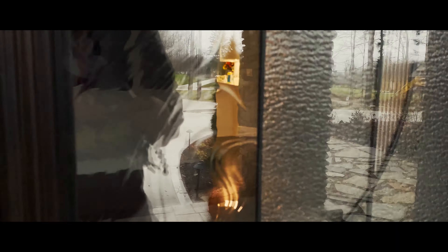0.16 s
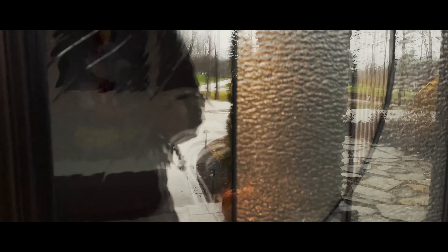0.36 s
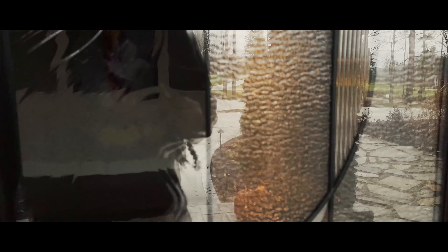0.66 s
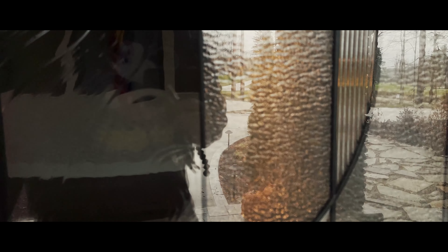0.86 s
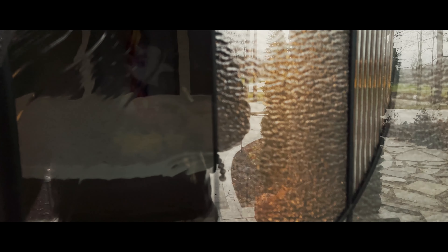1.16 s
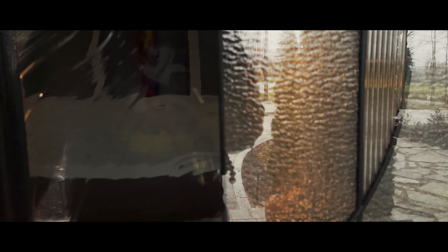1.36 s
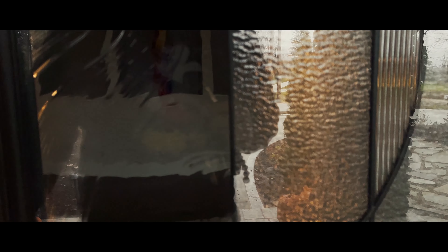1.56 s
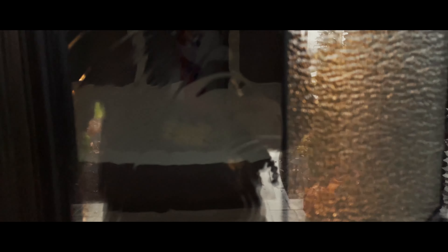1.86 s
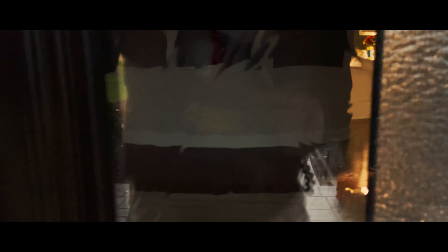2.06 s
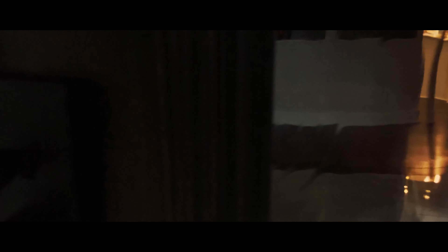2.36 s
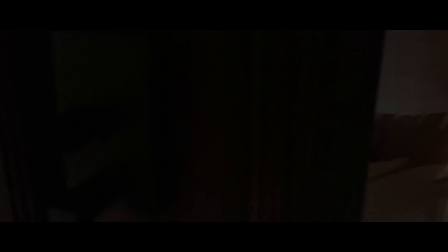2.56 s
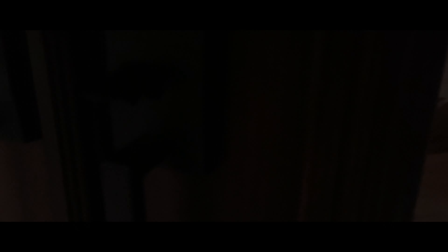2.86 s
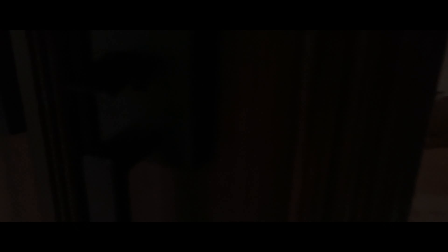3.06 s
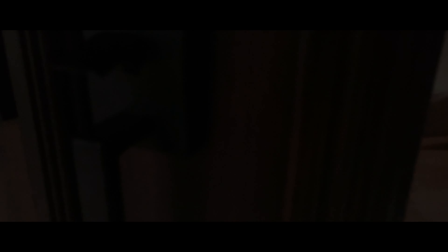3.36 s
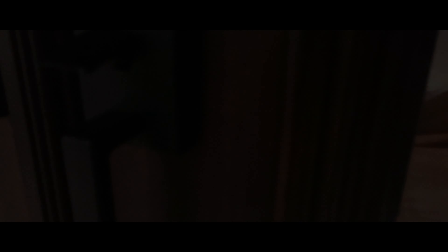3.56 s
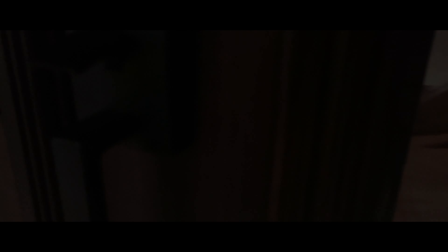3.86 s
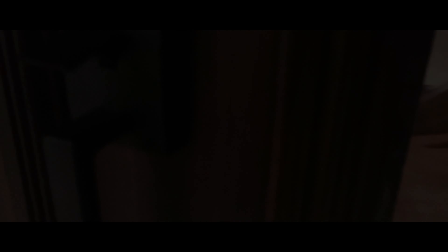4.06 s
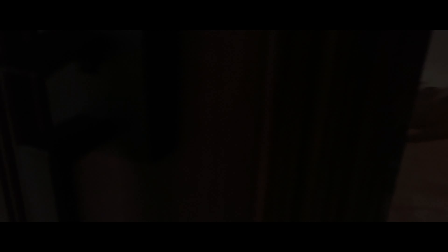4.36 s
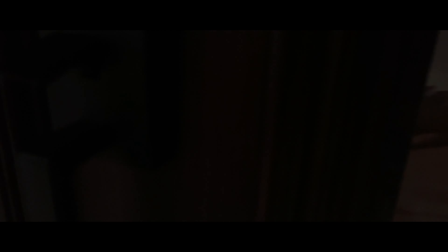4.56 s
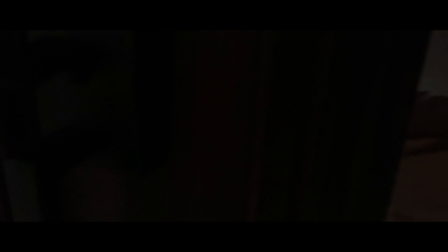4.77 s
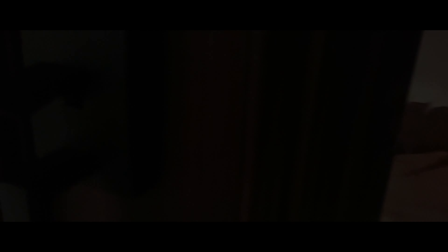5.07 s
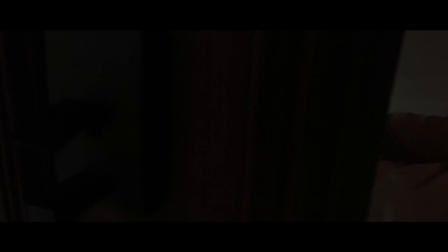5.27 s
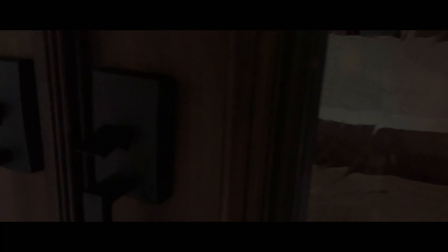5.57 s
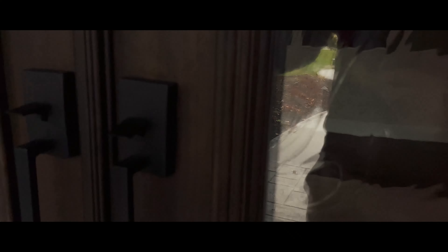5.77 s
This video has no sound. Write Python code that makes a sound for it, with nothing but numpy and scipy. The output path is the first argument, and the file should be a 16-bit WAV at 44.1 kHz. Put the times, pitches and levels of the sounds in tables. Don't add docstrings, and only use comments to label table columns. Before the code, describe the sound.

Close stereo handheld pickup outside a front door. Cloth rustles, small snaps and a dull double footfall on wooden boards come first, over distant traffic and a low engine hum. Tiny high clicks follow. After a quiet stretch, knuckles rap seven times, evenly spaced, on a heavy glazed door, each with a woody thump, brief ring and faint lock and glass rattle. Rustling and ticks end it.

```python
import sys
import numpy as np
from scipy import signal
from scipy.fft import rfft, irfft, next_fast_len
from scipy.io import wavfile
from scipy.ndimage import uniform_filter1d

SR = 44100
rng = np.random.default_rng(int(sys.argv[2]) if len(sys.argv) > 2 else 0)


def output_pcm(signal):
    pcm = np.clip(np.atleast_2d(signal).T, -1, 1) * 32767
    wavfile.write(sys.argv[1], SR, np.round(pcm).astype(np.int16))


def amplitude_ratio(level_db):
    exponent = np.asarray(level_db, float) / 20
    return 10 ** exponent


N = 261056
T = np.arange(N) / SR
PORTS_M = 0.38
DOOR_SIZE, LEAD_S = 32768, 0.02


def colour(table, size):
    hz, db = np.transpose(table)
    bins = np.log(np.fft.rfftfreq(size, 1 / SR) + 1)
    return amplitude_ratio(np.interp(bins, np.log(hz), db, left=-90, right=-90))


def hump(hz):
    return [(hz / 3, -24), (hz / 1.47, -10), (hz, 0), (hz * 1.33, -8), (hz * 1.35, -15),
            (min(hz * 4, 12500), -28)]


def causal(gain):
    fold = irfft(np.log(gain))
    half = len(fold) // 2
    return np.exp(rfft(np.r_[fold[0], 2 * fold[1:half], fold[half], np.zeros(half - 1)]))


def unit(x):
    return x / np.sqrt(np.mean(x ** 2))


def pan(db):
    return amplitude_ratio(np.array([[db / 2], [-db / 2]]))


def add(out, s, x):
    i = int(s * SR)
    out[:, i:i + x.shape[1]] += x[:, :N - i]


def diffuse(size):
    like = np.sinc(2 * np.fft.rfftfreq(size, 1 / SR) * PORTS_M / 343)
    mid, side = rfft(rng.standard_normal((2, size)))
    return np.sqrt(1 + like) * mid + np.sqrt(1 - like) * side * np.array([[1], [-1]])


def walk(rate):
    k = int(SR / rate)
    held = rng.standard_normal(1024)[np.arange(N) // k]
    return uniform_filter1d(uniform_filter1d(held, k), k)


def ring(t, hz, db, t60):
    return amplitude_ratio(db - 60 * t / t60) * np.sin(2 * np.pi * hz * t)


def burst(table, db, t60, pan_db, rise=0.00092, size=16384):
    own = rng.standard_normal((3, size))
    noise = unit(irfft(rfft(own[0] + 2.64 * own[1:]) * colour(table, size), size))
    t = T[:size]
    fade = amplitude_ratio(db - 60 * t / max(t60, .004)) * np.cos(np.pi / 2 * t / t[-1])
    return noise * pan(pan_db) * fade * (1 - np.exp(-t / rise))


def bed(table, split_hz, flicker_db, rate):
    size = next_fast_len(N, True)
    f = np.fft.rfftfreq(size, 1 / SR)
    spectrum = diffuse(size) * colour(table, size)
    out = np.zeros((2, 2, N))
    for k in np.arange(8, 28):
        share = np.clip(1 - np.abs(2 * np.log2(f + 1) - k), 0, 1)
        band = irfft(spectrum * share, size)[:, :N]
        out[int(2 ** (k / 2) > split_hz)] += band * amplitude_ratio(flicker_db * walk(rate))
    return unit(out[0]), unit(out[1])


# t/s, peak level/dB, knuckle hardness f/Hz, body thump level/dB, left minus right level/dB
KNOCK_EVENTS = [
    (3.4543, -13.5, 762, -5, -2),
    (3.7322, -12, 1020, -7.5, -2),
    (4.0539, -18, 640, 4.5, -2),
    (4.3812, -11.5, 1450, -6.5, -2),
    (4.721, -14, 1480, -6, -2),
    (5.066, -13, 1030, -4, -2),
    (5.3365, -13.5, 1450, -8.5, -2),
]
SPOT_FREQS = [330, 450, 600, 760, 950, 1250, 1520]
KNOCK_SPOTS = [
    (5, 2, -2, -3, -7.5, -2, -8),
    (6, 1, -1, -1, -5, 0, -7),
    (6, 1, -2, -1, -3, -2, -5),
    (6, 6, 4, 0, 0, 3, -2),
    (6, 6, 4, -1, -1, 2, -4),
    (6, 3, 1, -3, -5, 2, -6.5),
    (6, 6, 6, 1, -5, 7, -3),
]


def door():
    f = np.fft.rfftfreq(DOOR_SIZE, 1 / SR)
    out = np.zeros((2, N))
    direct = panel_chirps(f)
    body = direct / np.abs(irfft(direct, DOOR_SIZE)).max()
    body = body + amplitude_ratio(-17.5) * panel_modes(f) * f ** 2 / (f ** 2 + 50 ** 2)
    body = body + amplitude_ratio(-33) * panel_wash(f)
    for (s, db, hard_hz, thump_db, pan_db), spot_db in zip(KNOCK_EVENTS, KNOCK_SPOTS):
        push = amplitude_ratio(thump_db / (1 + (f / 130) ** 2)) / np.sqrt(1 + (f / hard_hz) ** 2)
        push = push * amplitude_ratio(np.interp(f, [200, *SPOT_FREQS], [0, *spot_db]))
        push = np.where(f > 2000, .38, push)
        blow = irfft(body * causal(push), DOOR_SIZE)
        add(out, s - LEAD_S - .0003, blow * amplitude_ratio(db + 6) * pan(pan_db))
    return out


# left delay t/ms, right delay t/ms, spread t/ms at 100 Hz,
# left level/dB, right level/dB, lowest f/Hz that turns back
PANEL_PATHS = [
    (-1.05, -0.82, 10.8, 2.7, 1.5, 18),
    (-0.78, 4.43, 10.7, -11.4, 4.4, 122),
    (2.65, 6.3, 13.5, -28, -6.7, 221),
    (9.2, 14.6, 13.5, -18, -22.5, 240),
]
# f/Hz, level/dB per Hz
BLOW_COLOUR = [(35, -23.5), (60, -4.5), (110, -6.5), (160, -1.5), (200, -2), (270, 2.5), (370, -1),
               (460, -11.5), (570, 2), (700, -5.5), (900, 6.3), (1080, -1.5), (1180, -18.5), (1270, -2),
               (1390, -37), (1520, 1), (1700, -43.5), (2400, -70)]


def panel_chirps(f):
    chirps = 0
    for left_ms, right_ms, spread, left_db, right_db, low_hz in PANEL_PATHS:
        delay = LEAD_S + np.array([[left_ms], [right_ms]]) / 1000
        turn = f * delay + spread / 50 * np.sqrt(f)
        gain = amplitude_ratio(np.array([[left_db], [right_db]])) * f ** 2 / (f ** 2 + low_hz ** 2)
        chirps = chirps + gain * np.exp(-2j * np.pi * turn)
    blow = causal(np.maximum(colour(BLOW_COLOUR, DOOR_SIZE), amplitude_ratio(-45.5)))
    shade = np.array([np.ones_like(f), 1 / np.sqrt(1 + (f / 640) ** 5)])
    return blow * chirps / (1 + (f / 2200) ** 8) * shade


# f/Hz, level/dB, t60 t/s, left minus right level/dB
MODES = [(65.7, 15.8, 0.088, 1.7), (101.2, 1.5, 0.13, 3.5), (163, -8, 0.45, -1), (200.4, 3.3, 0.2, 3.4),
         (290, -14.5, 0.18, -4.5), (331, -13.5, 0.4, 0), (382, -15.5, 0.3, -7), (450, -12, 0.35, 1),
         (530.4, -11.5, 0.24, 4.5), (562.5, -11, 0.15, -2), (660, -11.5, 0.3, 6.5), (680.4, -10, 0.053, -3),
         (769, -1.5, 0.135, 3), (850, -8.5, 0.165, 7), (893, -10, 0.2, 11.5), (1244.4, -20.5, 0.14, 3)]


def panel_modes(f):
    t = T[:DOOR_SIZE]
    modes = rfft(sum(ring(t, hz, db, t60) * pan(pan_db) for hz, db, t60, pan_db in MODES))
    turn = f * (LEAD_S + np.array([[.0002], [.0006]])) + 0.1863 * np.sqrt(f)
    return modes * np.exp(-2j * np.pi * turn)


# f/Hz, level/dB per Hz
WASH_COLOUR = [(40, -23.5), (70, 3.5), (120, -3), (200, -1), (260, -10), (340, -6), (587, -10), (950, -10),
               (1500, -28.5), (3400, -36), (7000, -57), (9000, -59.5), (11300, -60), (12500, -79)]
# f/Hz, t60 t/s
WASH_T60 = [(60, 0.13), (300, 0.32), (1100, 0.42), (3000, 0.24), (10000, 0.083)]


def panel_wash(f):
    noise = diffuse(DOOR_SIZE) * colour(WASH_COLOUR, DOOR_SIZE)
    late = np.maximum(T[:DOOR_SIZE] - LEAD_S, 0)
    hz, seconds = np.transpose(WASH_T60)
    wash = 0
    for k in np.arange(5, 15):
        t60 = np.interp(k, np.log2(hz), seconds)
        band = irfft(noise * np.clip(1 - np.abs(np.log2(f + 1) - k), 0, 1), DOOR_SIZE)
        wash = wash + band * amplitude_ratio(-60 * (late - .07) / t60) * (1 - np.exp(-late / 0.01))
    return rfft(wash) / np.std(irfft(noise, DOOR_SIZE))


# t/s, peak level/dB, ring f/Hz
RATTLES = [(3.49, -51, 2800), (3.504, -51, 3300), (3.59, -59, 2800), (3.605, -59, 3300), (3.692, -63, 3300),
           (3.782, -48, 3300), (3.869, -58, 3300), (3.908, -60, 3500), (5.17, -56, 3300), (5.44, -58, 3300),
           (3.5212, -50.5, 3445), (3.5604, -57.5, 3323), (3.7666, -45, 2470), (3.799, -52.5, 3520),
           (3.837, -58.5, 3400), (3.8895, -58.5, 3750), (3.9654, -67, 3432), (4.086, -45.5, 2493),
           (4.1078, -48, 3330), (4.1538, -59, 2290), (4.2387, -53.5, 3020), (4.4456, -46, 3330),
           (4.5818, -55.5, 2840), (4.7035, -64, 2860), (4.7828, -48.5, 3240), (4.8847, -55, 3955),
           (4.955, -64, 3139), (5.1, -48, 2450), (5.126, -48, 3340), (5.25, -51, 2830), (5.3705, -48, 2423),
           (5.4053, -45.5, 3348), (5.4892, -62.5, 2450)]
# wait t/s, peak level/dB, ring f/Hz
LOCK_BOUNCES = [
    (0.013, -46.5, 2420),
    (0.138, -59, 2400),
]
# f/Hz, level/dB per Hz
CHATTER_COLOUR = [(710, -33), (1200, 14), (2510, -1), (4090, 0), (7080, -35.5), (8470, -24), (10100, -38),
                  (11900, -40), (13000, -60)]


def lock():
    out = np.zeros((2, N))
    t60 = 0.04
    bounces = [(s + wait, db, hz) for s, *_ in KNOCK_EVENTS for wait, db, hz in LOCK_BOUNCES]
    for s, db, hz in RATTLES + bounces:
        pan_db = 1.5 + 5 * np.log2(hz / 2400)
        add(out, s, burst(hump(hz), db - 4, t60, pan_db, size=2048))
        add(out, s, burst(CHATTER_COLOUR, db - 3, t60, pan_db, size=2048))
    return out


def glazing_buzz():
    out = np.zeros((2, N))
    longest_s, t60, buzz_db, fade_db = 0.22, 0.02, -41, 16
    for s, db, *_ in KNOCK_EVENTS:
        for wait, pitch, weakness in rng.random((16, 3)):
            level_db = db / 2 - 6.5 + buzz_db - fade_db * wait - 6 * weakness
            buzz = burst(hump(2200 + 2400 * pitch), level_db, t60, 8.6, size=1024)
            add(out, s + .01 + longest_s * wait ** 1.5, buzz)
    return out


# t/s, level/dB, t60 t/s, brightness level/dB per octave
FOOTFALLS = [
    (0.422, -40, 0.11, 3),
    (0.574, -28.5, 0.2, -4),
    (0.603, -31, 0.25, -3),
    (.688, -46, .1, -8),
]
# f/Hz, level/dB, t60 t/s
BOARD_MODES = [(94.3, -1, 0.33), (125, -1, .25), (155.7, -0.5, 0.2), (194, -7, 0.17), (270, -12, 0.2),
               (335, -12, .15), (400, -11, 0.3), (560, -16, 0.12), (900, -20, 0.08)]


def footsteps():
    out = np.zeros((2, N))
    t = T[:SR // 2]
    for s, db, step_t60, tilt_db in FOOTFALLS:
        thud = 0
        for hz, mode_db, mode_t60 in BOARD_MODES:
            detune, stress = rng.standard_normal(2)
            level_db = mode_db + 1.5 * stress + tilt_db * np.log2(hz / 200)
            thud = thud + ring(t, hz * (1 + 0.025 * detune), level_db, mode_t60 * step_t60 / 0.25)
        add(out, s, amplitude_ratio(db - 4) * thud * (1 - np.exp(-t / 0.003)) * pan(0))
    return out


# t/s, peak level/dB above 7 kHz, ring f/Hz, middle level/dB
TICK_EVENTS = [(0.5497, -61, 9100, -46.5), (0.7588, -42, 9500, -45.5), (1.0291, -65, 9250, -56.5),
               (1.326, -55.5, 10590, -56), (1.4697, -48, 10940, -58), (1.6321, -51, 10790, -55),
               (2.246, -38.5, 11300, -50.5), (2.2668, -32, 11360, -52), (2.3523, -39.5, 11700, -56),
               (2.6933, -41.5, 9500, -57.5), (3.3124, -52, 9180, -73), (4.7127, -52, 9010, -77),
               (4.904, -51.5, 9370, -83), (5.0403, -53, 11400, -63), (5.1058, -44, 9160, -71),
               (5.1332, -37, 10600, -49), (5.152, -35, 9200, -55), (5.224, -53, 9030, -69),
               (5.2927, -51, 9300, -59), (5.4914, -45.5, 9500, -62), (5.5264, -38.5, 11160, -56),
               (5.575, -53, 8880, -56), (5.611, -42, 11600, -61), (5.64, -46.5, 7600, -56),
               (5.696, -47.5, 10730, -57), (5.7249, -46, 9280, -78), (5.7468, -44.5, 12440, -67)]
# f/Hz, level/dB per Hz
TICK_COLOUR = [(6000, -13), (8300, -14.5), (9200, -0.5), (10200, -2), (11200, 1), (12000, -15),
               (13000, -33), (14400, -25), (14900, -24)]


def camera_ticks():
    out = np.zeros((2, N))
    t60 = 0.037
    middle = [(1300, 11), (2000, -1), (3000, -3), (4500, -3), (6500, -7), (9000, -38)]  # f/Hz, level/dB
    for s, db, hz, middle_db in TICK_EVENTS:
        add(out, s, ring(T[:1024], hz, db - 1.5, 0.29 * t60) * pan(0))
        add(out, s, burst(TICK_COLOUR, db - 10, 0.94 * t60, 0, size=2048))
        add(out, s, burst(middle, middle_db, t60, 3.4, size=2048))
    return out


# t/s, ring f/Hz, level/dB, t60 t/s
HOLLOW_TAPS = [
    (.424, 680, -40, .04),
    (.426, 330, -37, .07),
    (.567, 400, -38, .06),
    (.598, 400, -41, .22),
    (.712, 600, -43, .04),
    (1.497, 1500, -51, .05),
    (1.567, 560, -41, .06),
    (1.576, 920, -42, .04),
    (1.585, 540, -43, .05),
    (1.592, 420, -45, .06),
]


def hollow_taps():
    out = np.zeros((2, N))
    t = T[:SR // 2]
    for s, hz, db, t60 in HOLLOW_TAPS:
        add(out, s, ring(t, hz, db, t60) * (1 - np.exp(-t / .0015)) * pan(2))
    return out


# t/s, ring f/Hz, ring level/dB, high level/dB, low level/dB
SNAP_EVENTS = [(.323, 1600, -56, -55, -51), (.376, 1640, -41.5, -45, -41), (.409, 4520, -47, -44, -49),
               (0.415, 4950, -51, -37.5, -47), (0.398, 900, -52, -52, -41), (0.475, 2500, -60, -68, -55),
               (.422, 3700, -43, -44, -36.5), (0.5641, 2880, -34.5, -60, -38), (.713, 900, -52, -72, -44),
               (1.354, 3960, -62, -72, -53), (1.421, 2500, -50, -66, -53), (1.458, 3440, -65, -83, -55),
               (1.4851, 1750, -45, -60, -51), (1.4833, 3220, -49, -63, -56), (1.574, 2360, -48, -58, -50),
               (1.423, 950, -53, -80, -66), (4.191, 900, -56, -80, -56), (5.54, 1200, -56, -80, -56),
               (5.672, 2050, -57, -66, -70), (5.612, 4000, -60, -80, -80), (1.952, 5000, -66, -84, -54),
               (5.768, 2980, -54.5, -70, -70)]
# t/s, ring f/Hz, ring level/dB, low level/dB, t60 t/s
SCRAPE_EVENTS = [(.14, 1500, -62, -54, 0.31), (.172, 2450, -60, -48, 0.2), (.57, 2300, -51, -41, 0.23),
                 (.425, 3030, -52, -52, 0.15), (0.786, 4190, -47, -47.5, 0.24), (.787, 876, -42, -58, 0.28),
                 (1.06, 4100, -70, -60, 3.3), (1.179, 5400, -74, -75, 1), (2.1, 1700, -63, -61, 1.1),
                 (2.44, 5700, -71, -57, 1.5), (5.762, 2990, -50, -63, 0.12)]


def snaps_and_scrapes():
    out = np.zeros((2, N))
    for s, hz, db, high_db, low_db in SNAP_EVENTS:
        add(out, s, scuff(hz, db, high_db, low_db, rise=0.00042, t60=0.046, high_t60=0.058))
        add(out, s + 0.001003, ring(T[:1024], hz, db, 0.011) * pan(2.6))
    for s, hz, db, low_db, t60 in SCRAPE_EVENTS:
        add(out, s, scuff(hz, db, db - 35, low_db, 0.025 * t60, t60, t60))
    return out


# f/Hz, level/dB per Hz
SHEEN_COLOUR = [(3500, -22), (5000, -9), (7500, -8), (9200, -5), (11200, -2.5), (12100, -16), (12700, -33)]
# f/Hz, level/dB per Hz
SCUFF_COLOUR = [(150, -36), (350, 3), (600, 1.5), (900, -3), (1500, -9), (2400, -22)]


def scuff(hz, db, high_db, low_db, rise, t60, high_t60):
    ringing = burst(hump(hz), db, t60, 5.5, rise)
    sheen = burst(SHEEN_COLOUR, high_db, high_t60, 0, rise)
    dull = burst(SCUFF_COLOUR, low_db, 1.16 * t60, 5, rise)
    return ringing + sheen + dull


# f/Hz, level/dB per Hz
CLOTH_COLOUR = [(900, -12), (1500, 1.5), (2500, -3.5), (4500, -3), (6500, -10.5), (8000, -14.5), (9300, -7),
                (11000, -4.5), (11800, -17), (12400, -31), (14000, -63)]
# start t/s, length t/s, rub level/dB, sheen level/dB
CLOTH_MOVES = [(-.5, 1.35, -70.5, -71.5), (0.592, 0.063, -64.5, -72), (0.75, 0.038, -61.5, -73),
               (0.994, 0.38, -71, -90), (1.2, .5, -73.5, -90), (1.474, 0.57, -78.5, -81.5),
               (2.068, 0.51, -70.5, -73.5), (2.45, 0.29, -78.5, -75), (5.014, 0.25, -74.5, -70.5),
               (5.2, .35, -84, -77), (5.468, 0.48, -72.5, -67), (5.66, .36, -62, -64)]


def clothes():
    low, high = bed(CLOTH_COLOUR, 7000, 2.63, 30)
    rub, sheen = amplitude_ratio(-84.5), amplitude_ratio(-85.5)
    flinches = [(s, 0.15, -82.5, -120) for s, *_ in KNOCK_EVENTS]
    for s, length, rub_db, sheen_db in CLOTH_MOVES + flinches:
        swell = np.clip((T - s) / (0.35 * length), 0, 1)
        shape = swell * np.exp(-np.maximum(T - s - length, 0) / 0.034)
        rub = np.hypot(rub, shape * amplitude_ratio(rub_db))
        sheen = np.hypot(sheen, shape * amplitude_ratio(sheen_db))
    return (low * rub + high * sheen) * amplitude_ratio(2.5 + 3.3 * walk(83)) * pan(4.3)


# t/s, firing f/Hz, level/dB
ENGINE_COURSE = [(0, 69, -50), (.28, 72.3, -49.5), (.74, 71.13, -42), (1.1, 71.3, -48), (1.35, 70.4, -44.5),
                 (1.73, 67.75, -49), (1.95, 68.78, -45.5), (2.49, 66, -45.5), (2.75, 64.56, -53),
                 (3.0, 62, -44), (3.4, 58.84, -52.5), (4.201, 53.9, -45), (4.6, 53.64, -42),
                 (5.0, 52.6, -42.5), (5.25, 51, -47), (5.54, 50.93, -42), (5.92, 51.3, -52)]
# t/s, f/Hz, level/dB, width t/s
FAR_DRONES = [
    (2.5, 315, -66, .2),
    (3.102, 321.2, -70.5, 0.16),
    (4.6, 280.8, -57.5, 0.14),
    (5.75, 250, -65.5, .12),
]


def engine():
    s, hz, db = np.transpose(ENGINE_COURSE)
    phase = 2 * np.pi * np.cumsum(np.interp(T, s, hz) * (1 + .025 * walk(19))) / SR
    near = np.sin(phase) * amplitude_ratio(np.interp(T, s, db) + 2.5 + 1.94 * walk(16))
    waver = np.cumsum(1 + 0.0118 * walk(12)) / SR
    far = 0
    for s, hz, db, width in FAR_DRONES:
        far = far + np.sin(2 * np.pi * hz * waver) * amplitude_ratio(db + 3) * np.exp(-((T - s) / width) ** 2)
    return (near + far) * pan(0.22)


# f/Hz, level/dB per Hz
STREET_COLOUR = [(22, -42), (38, -2), (55, 10), (80, 0), (125, -1.5), (200, -8), (270, -13.5), (450, -14),
                 (800, -14.5), (1200, -21), (1700, -27), (2500, -39), (3500, -51)]
# t/s, share 0-1
DOORWAY = [
    (1.6, 0),
    (3.3, 1),
    (5.5, 0.9),
    (5.92, 0),
]
# t/s, level/dB, width t/s
STREET_SWELLS = [
    (.6, 7.5, 0.17),
    (4.7, 3.0, 1),
]


def street():
    low, high = bed(STREET_COLOUR, 350, 1.3, 6.12)
    deep = np.interp(T, *np.transpose(DOORWAY))
    swell_db = sum(db * np.exp(-((T - s) / width) ** 2) for s, db, width in STREET_SWELLS)
    rumble = low * amplitude_ratio(-53 + 2 * deep)
    hiss = high * amplitude_ratio(-57.5 - 5 * deep) * pan(2.75)
    return (rumble + hiss) * amplitude_ratio(swell_db)


def scene():
    handling = camera_ticks() + hollow_taps() + snaps_and_scrapes()
    near = door() + lock() + glazing_buzz() + footsteps() + handling + clothes()
    return near + engine() + street()


def roll_off(x):
    return signal.sosfilt(signal.butter(12, 15030, fs=SR, output="sos"), x)


def record(dry):
    left, right = rfft(dry)
    f = np.fft.rfftfreq(N, 1 / SR)
    shared = np.clip((f - 8300) / 600 + .5, 0, 1)
    late_right = right * np.exp(-2j * np.pi * f * 13 / SR)
    left = (1 - shared) * left - shared * late_right
    bass_cut = signal.butter(3, 40, "high", fs=SR, output="sos")
    heard = signal.sosfilt(bass_cut, irfft([left, right], N))
    return roll_off(heard)


dry = scene()
out = record(dry)
output_pcm(out)
```